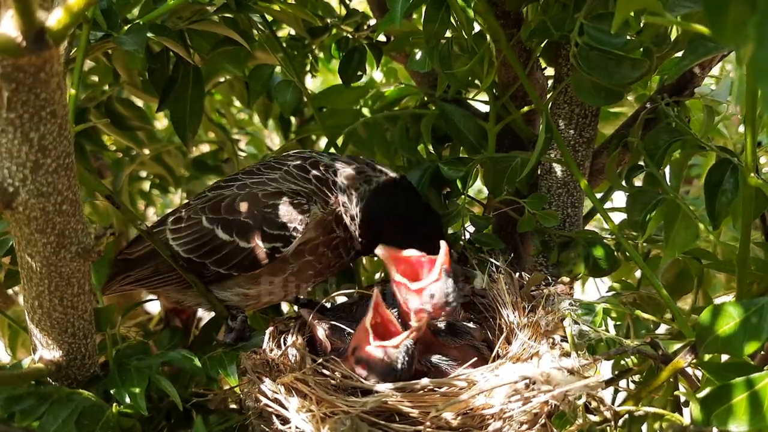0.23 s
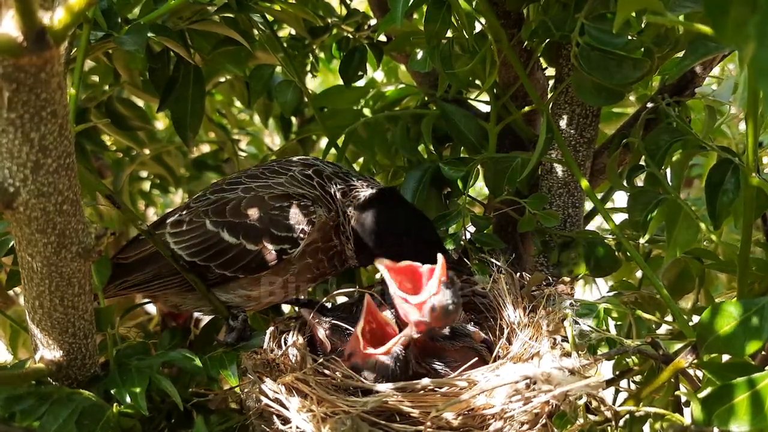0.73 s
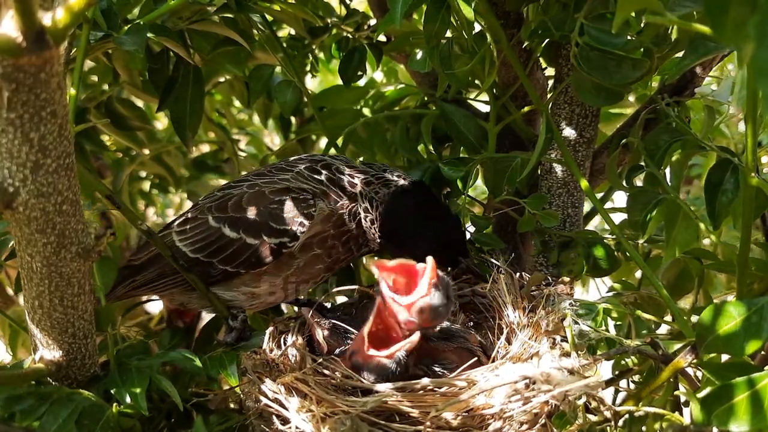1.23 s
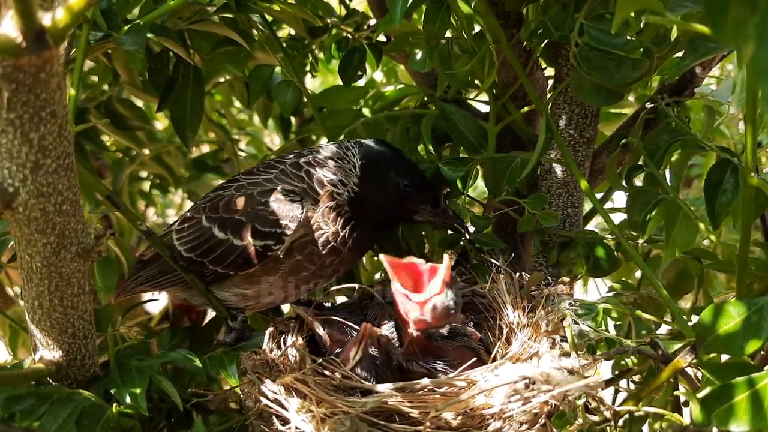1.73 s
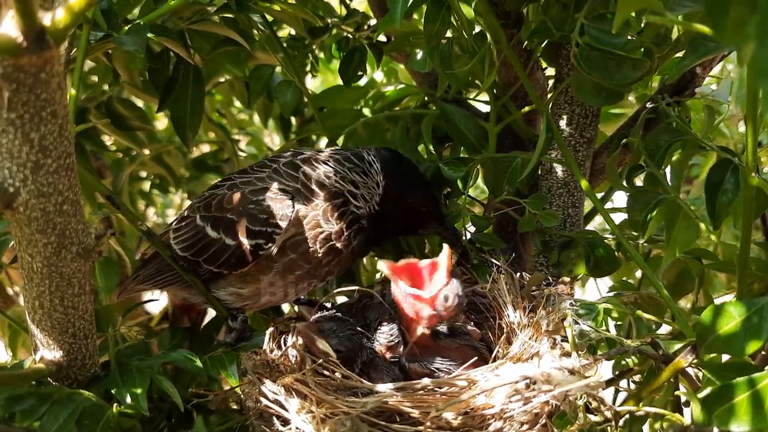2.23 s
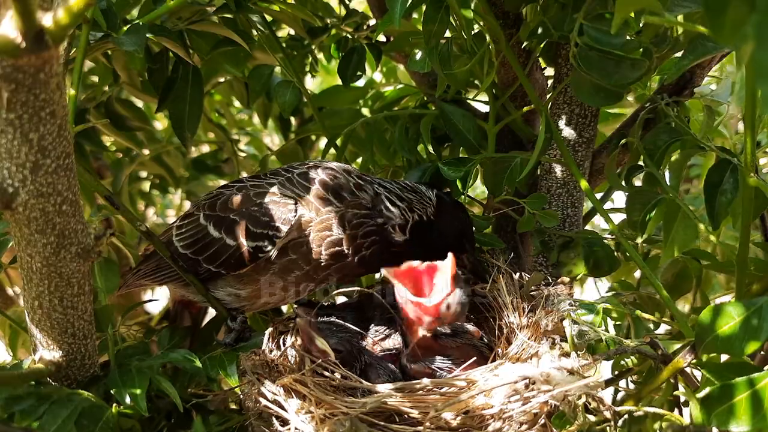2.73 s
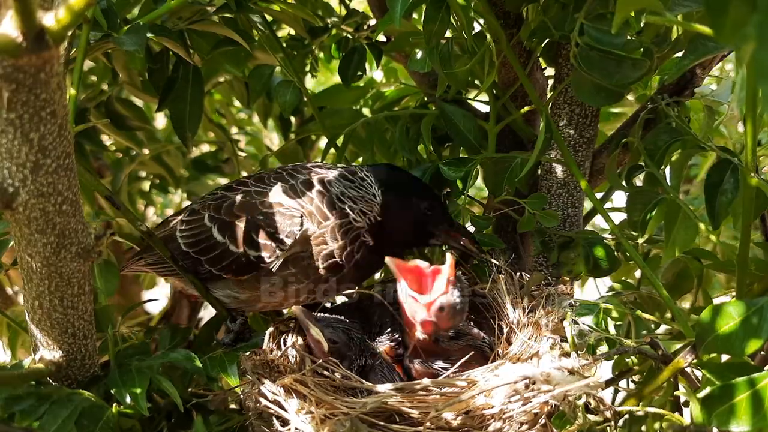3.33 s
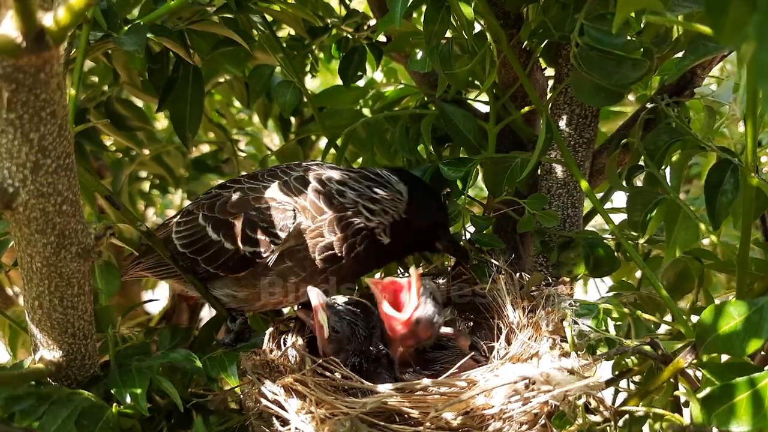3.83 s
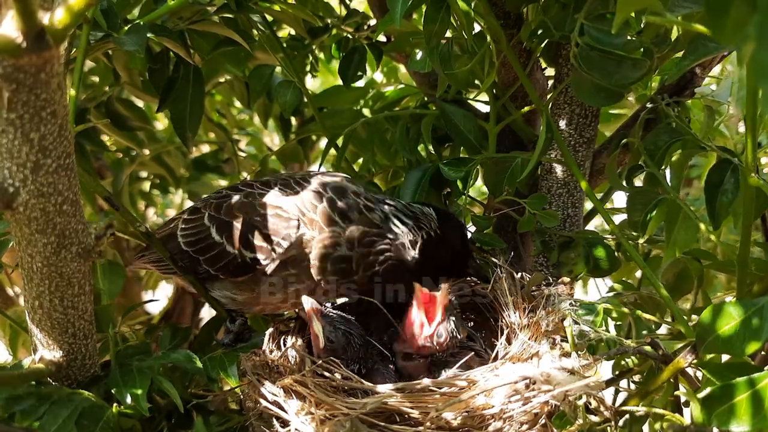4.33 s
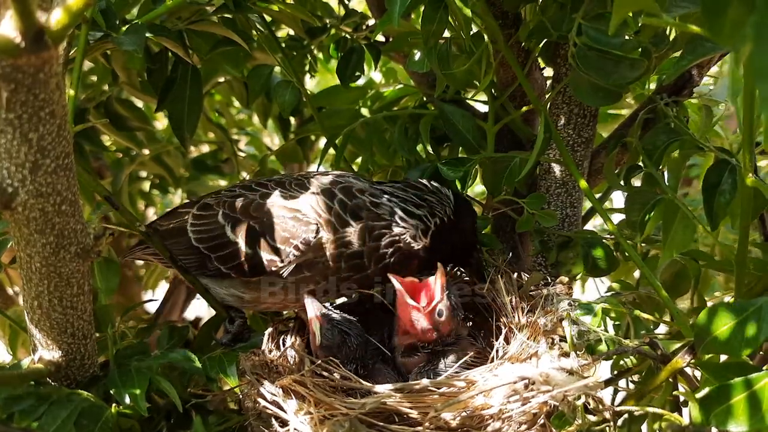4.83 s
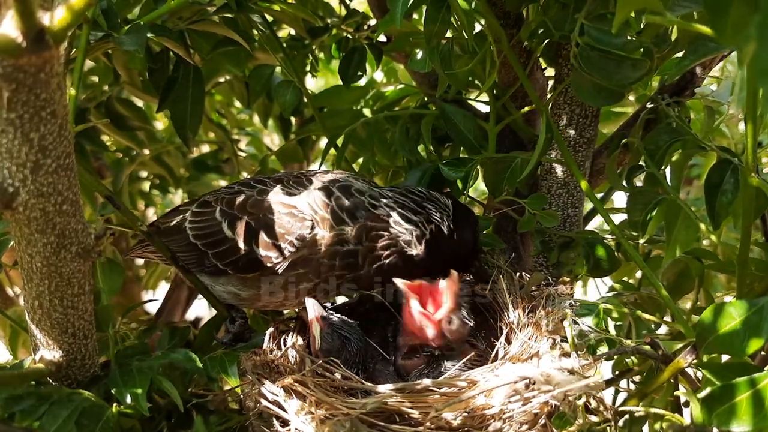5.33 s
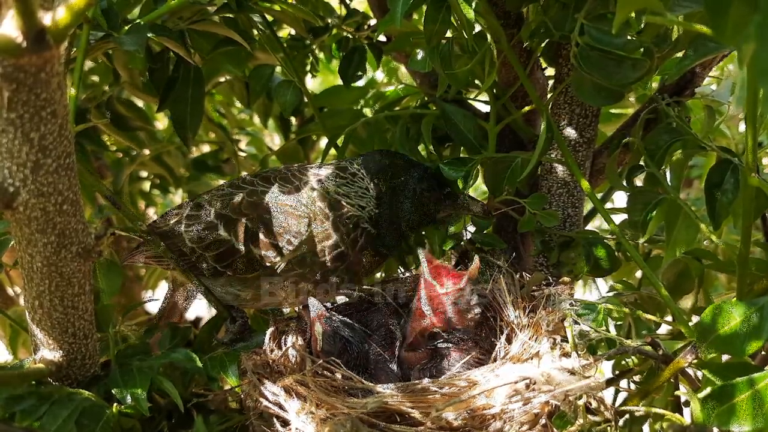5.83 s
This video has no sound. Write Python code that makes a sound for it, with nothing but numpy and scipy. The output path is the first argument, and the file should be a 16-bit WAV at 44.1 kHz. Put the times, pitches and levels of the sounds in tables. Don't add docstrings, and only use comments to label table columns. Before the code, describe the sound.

Close stereo pickup in a leafy shrub outdoors. One nestling gives three loud, piercing whistles that sweep upward with a rough beating edge, then tires to faint, hoarse ones. Another answers about once a second with a dry rasp clearing into a short high peep. A distant bird chucks in threes midway and at the end. Leaves hiss, twigs tick, and light wind thumps softly before a slight closing fade.

```python
import sys
import numpy as np
from scipy import signal
from scipy.fft import rfft, irfft, next_fast_len
from scipy.io import wavfile
from scipy.ndimage import uniform_filter1d

SR = 44100
rng = np.random.default_rng(int(sys.argv[2]) if len(sys.argv) > 2 else 0)


def master_out(mix):
    frames = np.transpose(np.atleast_2d(mix))
    ceiling = np.clip(frames, -1, 1)
    pcm = np.round(ceiling * 32767).astype(np.int16)
    wavfile.write(sys.argv[1], SR, pcm)


def nominal_scale(level):
    x = np.asarray(level, float) / 20
    return 10 ** x


N = 267951
t = np.arange(N) / SR


def unit(x):
    return x / np.sqrt(np.mean(x ** 2))


def band(x, hz, width, order=1):
    limits = [max(hz - width / 2, 10), hz + width / 2]
    return signal.sosfilt(signal.butter(order, limits, "band", fs=SR, output="sos"), x)


def walk(rate):
    hold = int(SR / rate)
    steps = np.repeat(rng.standard_normal(N // hold + 1), hold)
    return unit(uniform_filter1d(uniform_filter1d(steps, hold), hold)[:N])


def curve(rows):
    rows = np.array(rows)
    return nominal_scale(np.interp(t, rows[:, 0], rows[:, 1], left=-200, right=-200))


def place(x, pan_db, count):
    return np.array([x, nominal_scale(-pan_db) * np.roll(x, count)])


def voice(hz, gain, beats, weak, fullness, octave_db, hoarse_hz, shimmer_db):
    throb = np.sin(np.pi * beats)
    pair = np.sign(throb) * np.abs(throb) ** fullness - 1j * weak * np.cos(np.pi * beats)
    phase = 2 * np.pi * np.cumsum(hz + hoarse_hz * walk(1500)) / SR + np.angle(pair)
    tone = np.sin(phase) + nominal_scale(octave_db) * np.sin(2 * phase)
    return gain * np.abs(pair) * nominal_scale(shimmer_db * walk(700)) * tone


def whistle_hz(start, knee, rest_hz, climb_hz, warble_hz):
    bend_s, warble_s, scoop_hz, scoop_s = .009, .0215, 230, .02
    since = t - knee
    climb = climb_hz * bend_s * np.logaddexp(0, np.clip(since / bend_s, -50, 50))
    depth = warble_hz * np.interp(since, [-warble_s, 0, .001], [.1, .3, 1])
    warble = depth * (1 - np.cos(2 * np.pi * since / warble_s))
    scoop = scoop_hz * np.exp(-np.clip(t - start, 0, 1) / scoop_s)
    return rest_hz - scoop + climb + warble


def loud_whistles():
    # (start of the climb [s], resting pitch [Hz], climb [Hz/s], left minus right [dB])
    whistles = [
        (.197, 5820, 14000, 3),
        (.859, 5780, 13000, 3.5),
        (1.524, 5850, 17500, 4),
    ]
    # (time [s], peak level [dB], beats [count])
    beating = [
        [(.125, -33, .2), (.1646, -24, 1), (.1852, -21, 2), (.1993, -19, 4), (.2106, -16, 7), (.2226, -18, 9),
         (.2275, -18, 10), (.239, -17, 10.6), (.2425, -36, 11)],
        [(.7773, -36, .2), (.8048, -24, 1), (.8156, -22, 2), (.8535, -18, 4), (.873, -15, 8), (.8831, -15, 10),
         (.8935, -17, 11), (.907, -15, 13.6), (.932, -44, 16.4)],
        [(1.437, -28, .1), (1.4802, -17, 3), (1.4983, -15, 5), (1.5055, -14, 5.04), (1.5142, -13, 6),
         (1.5312, -14, 7), (1.5457, -11, 10), (1.5562, -21, 12), (1.597, -42, 16.5)],
    ]
    out = 0
    for (knee, hz, climb_hz, pan_db), rows in zip(whistles, beating):
        s, _, beats = np.transpose(rows)
        pitch = whistle_hz(s[0], knee, hz, climb_hz, warble_hz=210)
        call = voice(pitch, curve(rows), np.interp(t, s, beats), weak=.07,
                     fullness=.6, octave_db=-42, hoarse_hz=25, shimmer_db=.5)
        out = out + place(nominal_scale(-1.8) * call, pan_db, count=6)
    return out


def faint_whistles():
    # (start [s], start of the climb [s], end [s], resting pitch [Hz], peak level [dB])
    whistles = [
        (2.04, 2.14, 2.228, 5770, -33.5),
        (2.97, 3.024, 3.082, 5950, -39),
        (3.822, 3.825, 3.885, 5850, -43.5),
        (4.59, 4.65, 4.665, 5700, -36),
        (5.52, 5.586, 5.64, 5690, -34),
    ]
    attack_s, swell_db, sag_db = .006, -4, -7
    out = 0
    for start, knee, end, hz, db in whistles:
        breakup = np.interp(t, [start, end], [0, 1]) ** 2
        gain = curve([(start, db + swell_db), (knee, db), (end, db + sag_db)])
        gain = gain * np.clip(np.minimum(t - start, end - t) / attack_s, 0, 1)
        gain = gain * nominal_scale((1.5 + (db < -37) * 3 + 3 * breakup) * walk(70))
        pitch = whistle_hz(start, knee, hz, climb_hz=15500, warble_hz=0.46 * 210)
        call = voice(pitch, gain, .5 + 0 * t, weak=0, fullness=1., octave_db=-42,
                     hoarse_hz=25 + 170 * breakup, shimmer_db=.5 + 3 * breakup)
        out = out + place(nominal_scale(-3.0) * call, 1.5, count=6)
    return out


def throat_ring():
    # (pitch [Hz], width [Hz], level [dB])
    throat = [
        (4700, 900, 0),
        (5500, 900, 0),
        (6400, 1000, -1),
        (7300, 900, -10),
        (9500, 1800, -21),
    ]
    slaps_per_s = 1700
    slaps = (rng.random(N) < slaps_per_s / SR) * rng.uniform(-1, 1, (len(throat), N))
    ring = 0
    for x, (hz, width, db) in zip(slaps, throat):
        ring = ring + nominal_scale(db + 3 * walk(90)) * band(x, hz, width, order=2)
    return unit(ring)


def rasper():
    # (loudest throb [s], end [s], opening pitch [Hz], top pitch [Hz], peak level [dB])
    peeps = [
        (.077, .1, 4500, 5440, -21),
        (1.412, 1.437, 4050, 5530, -19),
        (2.544, 2.572, 4250, 5500, -25),
        (3.789, 3.815, 3800, 5330, -25),
        (4.773, 4.803, 4400, 5610, -19),
        (5.683, 5.744, 4800, 5410, -21.5),
    ]
    # (start [s], stop [s], level [dB], left minus right [dB])
    rasps = [
        (-.05, .068, -39, 5),
        (1.304, 1.412, -40.5, 3),
        (2.425, 2.538, -40.5, 2),
        (3.696, 3.787, -42, 2),
        (4.641, 4.772, -39.5, 4),
        (5.562, 5.714, -41, 6),
    ]
    # (time from the loudest throb [s], climb still to go [share], level offset [dB])
    approach = [
        (-.13, 1, -14),
        (-.075, .64, -12),
        (-.04, .25, -6),
        (0, .05, 0),
        (.018, 0, -1),
        (.035, 0, -3),
        (.062, 0, -14),
    ]
    throb_s, throb_hz, throb_db, rasp_throb_db = .018, 420, -13, 7
    rise_s, rise_db, after_db = .06, -11, -12
    ring = throat_ring()
    lead, to_go, offset_db = np.transpose(approach)
    out = 0
    for (top, end, low_hz, hz, peak_db), (start, stop, db, pan_db) in zip(peeps, rasps):
        since = t - top
        loose = np.interp(t, [stop - .004, stop + .004], [1, 0])
        rasp_db = db + np.interp(t, [start, start + rise_s], [rise_db, 0]) + after_db * (1 - loose)
        peep_db = peak_db + np.interp(since, lead, offset_db)
        rough = np.clip((rasp_db - peep_db + 22) / 14, 0, 1)
        on = np.clip(np.minimum(t - start, end - t) / 0.0078, 0, 1)
        sag = np.sin(np.pi * since / throb_s + .12 * walk(40)) ** 4
        pitch = hz - (hz - low_hz) * np.interp(since, lead, to_go) - throb_hz * (.4 + .75 * loose) * sag
        gain = on * nominal_scale(peep_db + throb_db * (.2 + .7 * loose) * sag)
        peep = voice(pitch, gain, .5 + 0 * t, weak=0, fullness=1., octave_db=-30 + 9.4 * rough,
                     hoarse_hz=40 + 170 * rough, shimmer_db=.8 + 3 * rough)
        rasp = nominal_scale(rasp_db + rasp_throb_db * (sag - .3)) * on * ring
        out = out + place(nominal_scale(-rough) * peep, pan_db, count=5)
        out = out + place(rasp, pan_db, count=6)
    return out


def far_bird():
    # (peak [s], level [dB], start pitch [Hz], top pitch [Hz], rise [s])
    chucks = [
        (2.24, -41.5, 2700, 2900, .012),
        (2.301, -38, 2000, 3100, .035),
        (2.39, -38, 2100, 2900, .03),
        (5.786, -38, 2500, 2900, .015),
        (5.848, -39, 1900, 3100, .035),
        (5.933, -35.5, 2200, 2800, .025),
    ]
    out = np.zeros(N)
    wobble, flutter = walk(900), walk(300)
    snap = unit(band(rng.standard_normal(N), 3000, 2500))
    for s, db, start_hz, top_hz, rise in chucks:
        u = (t - s) / rise
        hz = np.interp(u, [-1, 0], [start_hz, top_hz]) + 320 * wobble
        phase = 2 * np.pi * np.cumsum(hz) / SR
        growth = np.clip(1 + .7 * u, 0, 1) * (u > -1)
        decay = np.exp(-np.maximum(t - s, 0) / .007)
        out += nominal_scale(db - 4 + 4 * flutter) * np.where(u < 0, growth, decay) * np.sin(phase)
        out += nominal_scale(db - 1) * np.exp(-np.abs(t - s) / .008) * snap
    return place(out, 3.7, count=1)


def leaf_scatter(birds):
    tail = np.arange(2600) / SR
    scatter = rng.standard_normal((2, 2600)) * np.exp(-tail / .004) * (tail > .0004)
    scatter = scatter / np.sqrt(np.sum(scatter ** 2))
    return nominal_scale(-16) * signal.fftconvolve(birds, scatter, axes=1)[:, :N]


def twigs():
    # (time [s], peak level [dB], pitch [Hz], left minus right [dB])
    ticks = [
        (0.2424, -41.5, 7420, 3.5),
        (2.0183, -29, 7800, 3),
        (2.3022, -37, 10800, 6.5),
        (2.628, -32, 7850, 3.5),
        (4.573, -31.5, 8180, 0),
    ]
    out, tail = np.zeros((2, N)), np.arange(200) / SR
    for s, db, hz, pan_db in ticks:
        tick = band(rng.standard_normal(200) * np.exp(-tail / 0.00076), hz, 3000)
        gain = nominal_scale(db + np.array([[pan_db], [-pan_db]]) / 2)
        i = int(s * SR)
        out[:, i:i + 200] += gain * tick / np.abs(tick).max()
    return out


def gusts(calm_db, rows):
    return nominal_scale(calm_db) + sum(nominal_scale(db) * np.exp(-((t - s) / half) ** 2) for s, db, half in rows)


def port_thumps():
    # (time [s], level [dB], half length [s])
    left_gusts = [(0, -47, 0.15), (.28, -45, 0.087), (.92, -42, 0.095), (1.11, -44.5, 0.036),
                  (2.22, -47.5, 0.07), (2.65, -46, 0.1), (2.84, -37, 0.052), (3.6, -53, 0.054),
                  (4.5, -46.5, .15), (4.65, -31.5, 0.039), (4.76, -40, 0.057), (4.92, -28.5, 0.032),
                  (5.02, -34, 0.071), (5.4, -52, 0.024), (5.82, -44, .05), (6.03, -43, .03)]
    right_gusts = [(.7, -64, .15), (1.52, -40, 0.048), (1.85, -45.5, .025), (2.25, -61, 0.043),
                   (2.8, -58, .05), (3.27, -48, 0.02), (3.66, -43, .07), (3.8, -44, .07), (4.02, -46, .07),
                   (4.64, -38, .025), (5.33, -43, 0.049), (5.55, -38, 0.16), (5.8, -39, 0.027),
                   (5.95, -48, .05)]
    eddies = rng.standard_normal((2, N))
    left = band(eddies[0], 104.5, 96, order=3)
    left = left + nominal_scale(-1) * band(eddies[0], 64.4, 40, order=2)
    left = left + nominal_scale(-10.5) * band(eddies[0], 153, 67)
    left = unit(nominal_scale(1.1 * walk(21.94)) * left)
    right = unit(nominal_scale(3.3 * walk(14)) * band(eddies[1], 105, 110, order=2))
    return np.array([gusts(-49, left_gusts) * left, gusts(-68.5, right_gusts) * right])


def cavity_flutter():
    # (time [s], level [dB], half length [s])
    puffs = [(0, -33, 0.029), (.25, -42.5, 0.24), (.9, -43.5, .08), (1.2, -47, .04), (2.21, -34, .03),
             (2.275, -36, .035), (2.38, -45, 0.055), (2.72, -48.5, 0.14), (2.98, -52, 0.098),
             (4.6, -49.5, .2), (4.84, -32.5, 0.051), (5.55, -50, .13)]
    air = rng.standard_normal(N)
    cavity = band(air, 407, 270, order=3)
    cavity = cavity + nominal_scale(-4.0) * band(air, 360, 69)
    cavity = cavity + nominal_scale(-11) * band(air, 700, 360, order=2)
    flutter = gusts(-50.5, puffs) * unit(nominal_scale(5 * np.tanh(walk(70))) * cavity)
    return np.array([0.14 * flutter, nominal_scale(-3.5) * flutter])


def housing_shake():
    # (time [s], level [dB])
    push = [
        (5.36, -66),
        (5.398, -33),
        (5.48, -48.5),
    ]
    rumble = band(rng.standard_normal(N), 330, 430, order=2)
    shake = curve(push) * unit(nominal_scale(2 * walk(120)) * rumble)
    return np.array([shake, nominal_scale(2.5) * shake])


def leaves():
    # (frequency [Hz], left [dB per Hz], right [dB per Hz])
    hiss = np.array([(242, -69.5, -76), (395, -81.5, -83.5), (590, -80.5, -75), (980, -76, -78.5),
                     (1250, -75.5, -78.5), (2120, -76.5, -78.5), (3960, -78.5, -83), (5940, -83.5, -85.5),
                     (7700, -82.5, -88), (8650, -85, -88.5), (9600, -91.5, -93.5), (12400, -90.5, -94.5),
                     (13500, -96, -101), (15600, -99, -100.3)])
    # (time [s], treble level [dB])
    rustle = np.array([
        (0.0, -56),
        (0.82, -58),
        (3.78, -56),
        (5.67, -57),
        (5.75, -57),
    ])
    size = next_fast_len(N)
    noise = rfft(rng.standard_normal((2, size)))
    f = np.fft.rfftfreq(size, 1 / SR)[1:]
    density_db = [np.interp(np.log(f), np.log(hiss[:, 0]), hiss[:, side]) for side in (1, 2)]
    noise[:, 1:] *= nominal_scale(density_db) * np.sqrt(SR / 2)
    noise[:, 1:] *= 1 / (1 + (230 / f) ** 4)
    swell_db = np.interp(t, rustle[:, 0], rustle[:, 1] - rustle[:, 1].mean())
    patter_db = .4 * walk(14) + .5 * walk(60)
    out = np.zeros((2, N))
    for octave in np.arange(7, 14.5, .5):
        slot = np.append(0, np.clip(1 - 2 * np.abs(np.log2(f) - octave), 0, 1))
        treble_share = np.clip((octave - 10.5) / 0.63, 0, 1)
        gain = nominal_scale(treble_share * (swell_db + patter_db) + 1.08 * walk(8.7))
        out += gain * irfft(noise * slot, size)[:, :N]
    return nominal_scale(-0.44) * out


def insect():
    phase = 2 * np.pi * np.cumsum(11284 + 8 * walk(18)) / SR
    return nominal_scale(-75 + .9 * t + 1.4 * walk(5.7)) * np.sin(phase)


def scene():
    birds = loud_whistles() + faint_whistles() + rasper() + far_bird()
    birds = birds + leaf_scatter(birds)
    wind = port_thumps() + cavity_flutter() + housing_shake()
    return birds + twigs() + wind + leaves() + insect()


def roll_off(x):
    return signal.sosfilt(signal.butter(12, 15820, fs=SR, output="sos"), x)


def record(dry):
    # (time [s], level [dB])
    fade = [
        (5.72, 1.5),
        (5.85, -1),
        (6.08, -3.5),
    ]
    s, db = np.transpose(fade)
    return roll_off(dry * nominal_scale(np.interp(t, s, db)))


dry = scene()
out = record(dry)
master_out(out)
```